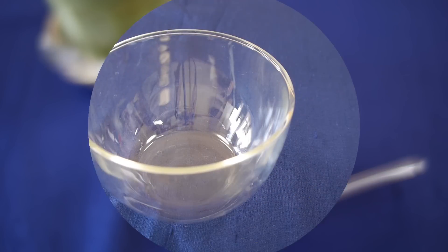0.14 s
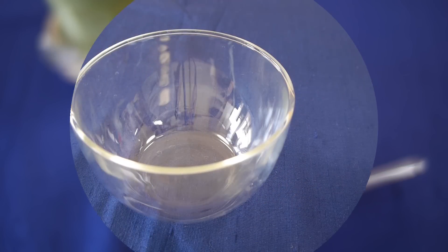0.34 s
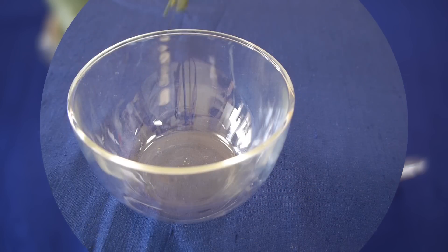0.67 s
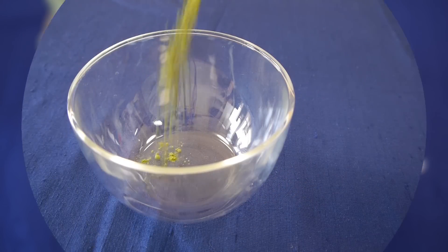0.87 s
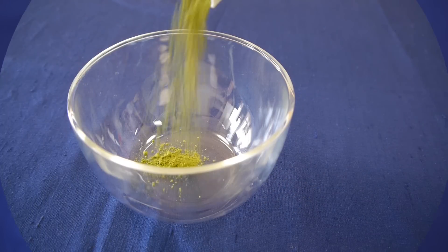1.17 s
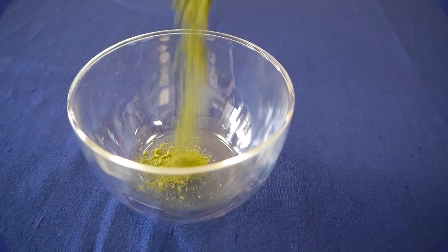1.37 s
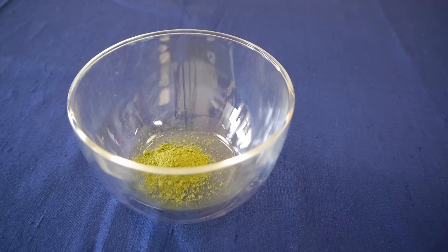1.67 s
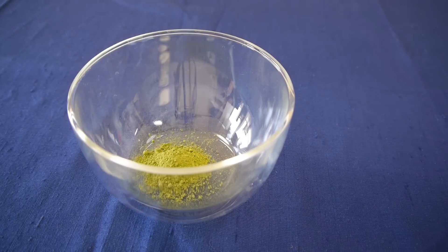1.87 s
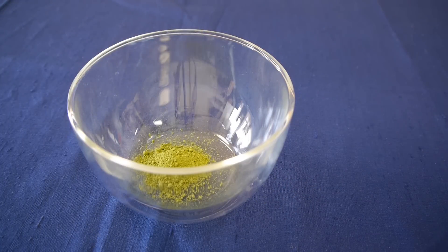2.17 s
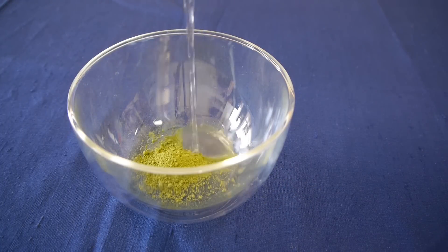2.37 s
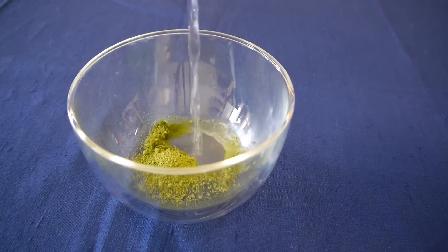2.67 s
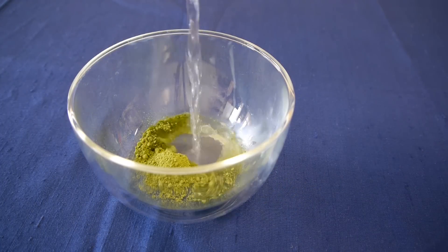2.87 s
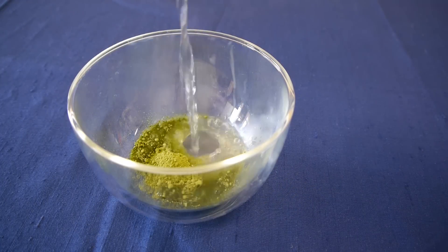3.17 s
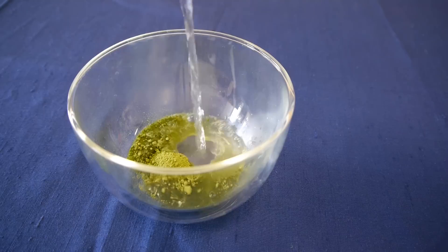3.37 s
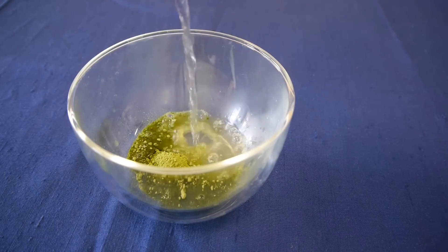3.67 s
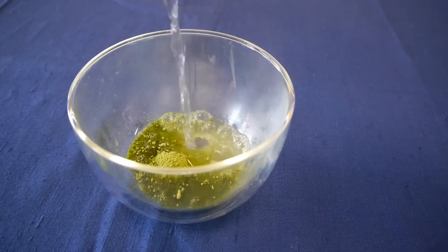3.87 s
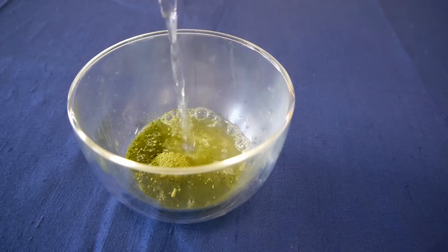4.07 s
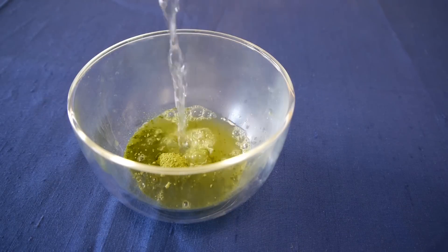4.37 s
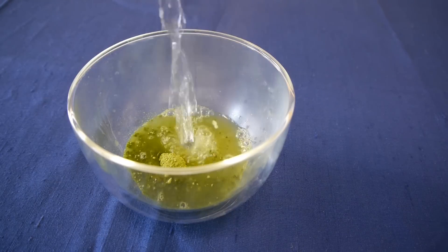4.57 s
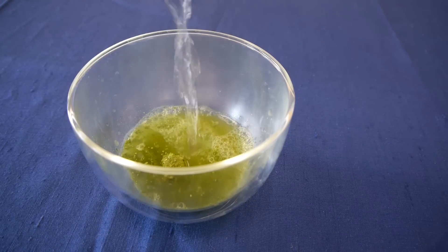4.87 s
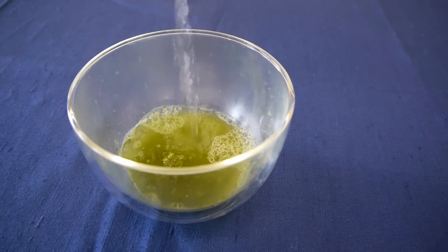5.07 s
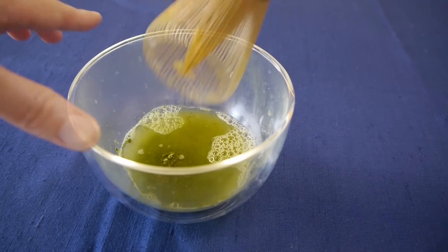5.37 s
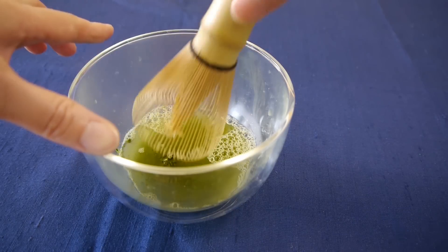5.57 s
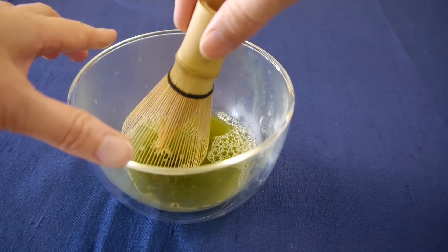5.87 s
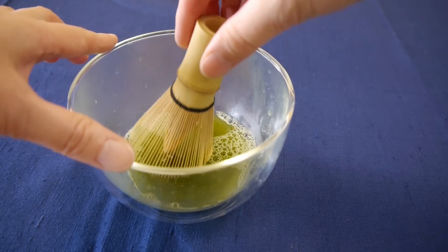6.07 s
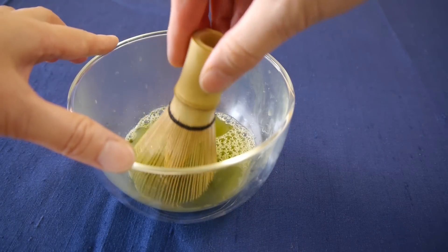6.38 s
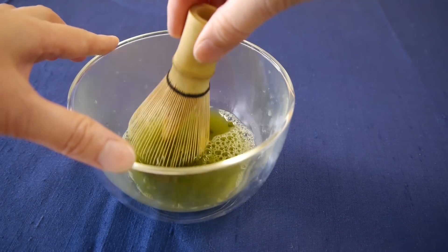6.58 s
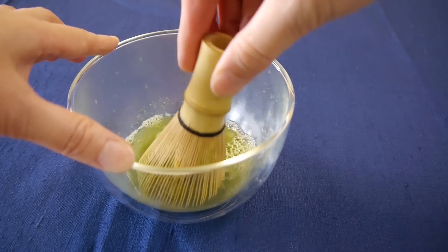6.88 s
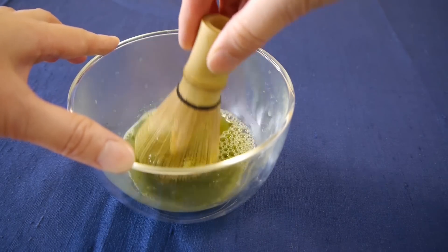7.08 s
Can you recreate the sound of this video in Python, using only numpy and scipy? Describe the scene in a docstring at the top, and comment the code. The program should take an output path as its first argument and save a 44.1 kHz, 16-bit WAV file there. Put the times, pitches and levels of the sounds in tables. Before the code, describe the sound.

Dry crumbs tinkle on glass, water pours in with bright splashing and bubbling, stops abruptly, and faint scratchy whisking follows in a quiet kitchen.

```python
"""A thin stream of water spatters on a glass bowl and gurgles in the growing pool, then its sound breaks off
abruptly: short damped tones make its drops and rising bubbles, coloured noise its spray and churn. Before it,
tea powder is tipped in: crumbs ring the modes of the glass, and dust hisses. After it foam fizzes, and a bamboo
whisk is lowered whose tines scrape and tick on the glass. A quiet kitchen hums behind, as noise and wavering
sines. One close microphone with gain control hears it all, the same in both channels."""
import sys
import numpy as np
from scipy import signal
from scipy.fft import rfft, irfft, next_fast_len
from scipy.io import wavfile
from scipy.ndimage import uniform_filter1d, map_coordinates

SR = 44100
rng = np.random.default_rng(int(sys.argv[2]) if len(sys.argv) > 2 else 0)


def dump_mix(stems):
    """Bounce the given channels to the path in sys.argv[1] as a 16-bit WAV at rate SR."""
    frames = np.atleast_2d(stems).T  # one column per channel
    limited = np.clip(frames, -1, 1)  # hard clip at full scale
    pcm = np.round(limited * 32767).astype(np.int16)
    wavfile.write(sys.argv[1], SR, pcm)


N = 319284

# modes of the glass bowl, lowest first: pitch_hz, relative level_db, nominal t60_s before damping
GLASS_MODES = [(876, -8.5, 0.052), (2822, -2.5, 0.12), (5530, -5, 0.027), (5623, -2, 0.076),
               (8500, -13, 0.021), (8750, -7.5, 0.053), (10630, -9.5, 0.081), (11100, -22, .08),
               (13970, -18, .05)]
# noise colour of dust, also used for foam: frequency_hz, relative level_db
DUST_COLOUR = [(880, -34), (1500, 2.5), (5670, -0.5), (7260, -3), (8660, 0), (15800, -15)]


def amp(db):
    """Gain for a level in dB."""
    return 10 ** (np.asarray(db) / 20)


def unit(x):
    """x scaled to rms 1."""
    return x / np.sqrt(np.mean(x ** 2) + 1e-20)


def curves(rows):
    """A gain per sample for each dB column after the time."""
    s, *columns = np.transpose(rows)
    t = np.arange(N) / SR
    return [amp(np.interp(t, s, db, -120)) for db in columns]


def wobble(rate):
    """A smooth random curve, rate knots a second."""
    grid_s = np.arange(0, N / SR + .001, .001)
    knots = rng.standard_normal(int(N * rate / SR) + 4)
    return np.interp(np.arange(N) / SR, grid_s, map_coordinates(knots, [grid_s * rate]))


def filtered(x, response):
    """x shaped by a complex response of frequency."""
    size = next_fast_len(N + SR // 2)
    return irfft(rfft(x, size) * response(np.fft.rfftfreq(size, 1 / SR)), size)[:N]


def grit(spectrum, per_s, spread_db, smooth):
    """Random specks of unequal size over a share of smooth noise, coloured, rms 1."""
    sizes = amp(spread_db * np.minimum(rng.exponential(size=N), 3))
    specks = (rng.random(N) < per_s / SR) * sizes
    burst = np.exp(-np.arange(96) / (0.00053 * SR))
    swell = unit(np.convolve(specks, burst)[:N])
    f, db = np.transpose(spectrum)

    def colour(hz):
        # straight lines in dB over log frequency
        return amp(np.interp(np.log(hz + 1), np.log(f + 1), db, -120, -120))
    return unit(filtered((swell + smooth) * rng.standard_normal(N), colour))


def swish(centre_hz, wide_hz):
    """A band of noise that follows a moving centre: two slow noises modulate a cosine and a sine."""
    slope = [(1, 0), (wide_hz / 2, -3), (wide_hz * 2, -30)]
    slow = [grit(slope, per_s=500, spread_db=0, smooth=.8) for _ in range(2)]
    turn = 2 * np.pi * np.cumsum(centre_hz) / SR
    return slow[0] * np.cos(turn) + slow[1] * np.sin(turn)


def blips(s, db, hz, t60, rise, soft_s, noisy, size):
    """Short damped tones that swell in and climb by a share rise of the pitch per t60; noise smears them."""
    t = np.arange(size) / SR
    db, hz, t60, rise = (np.reshape(v, (-1, 1)) for v in (db, hz, t60, rise))
    # 0 * db gives a shared pitch one row per event
    pitch_hz = np.minimum(hz * (1 + rise * t / t60) + 0 * db, SR / 2.2)
    turns = pitch_hz.cumsum(axis=1) / SR
    smear = 1 + noisy * uniform_filter1d(rng.standard_normal(turns.shape), size=4, axis=1)
    decay = amp(db - 60 * np.maximum(t - soft_s, 0) / t60)
    swell = np.minimum(t / soft_s, 1) ** 2
    wave = decay * swell * smear * np.sin(2 * np.pi * turns)
    at = (s * SR).astype(int)[:, None] + np.arange(size)
    return np.bincount(at.ravel(), wave.ravel(), N + SR)[:N]


def splashes(s, db, rise_s, fall_s):
    """An envelope that gathers just before each event and dies away after it, 60 dB in rise_s and fall_s."""
    t = np.arange(-SR // 50, SR // 12) / SR
    shape = np.where(t < 0, amp(60 * t / rise_s), amp(-60 * t / fall_s))
    events = np.bincount((s * SR).astype(int), amp(db), N)
    return signal.fftconvolve(events, shape)[SR // 50:][:N]


def strokes(rows, attack_s, release_s):
    """Gain that rises 20 dB, holds and falls 20 dB for each row, and the centre pitch passing from row to row."""
    t = np.arange(N) / SR
    gain = np.zeros(N)
    for s, hold, db, _ in rows:
        before = np.maximum(s - t, 0) / attack_s
        after = np.maximum(t - s - hold, 0) / release_s
        gain += amp(db - 20 * before - 20 * after)
    middles_s = [s + hold / 2 for s, hold, *_ in rows]
    return gain, np.interp(t, middles_s, [row[-1] for row in rows])


def glass(force, modes, damp):
    """Some of the bowl's modes, as resonators, answer a force; damp widens them and so shortens their ring."""
    def response(f):
        total = 0
        for hz, db, t60 in modes:
            drive = amp(db) * 1j * f * 1.19 * damp / t60
            total = total + drive / (hz * hz - f * f + 1j * f * 1.4 * damp / t60)
        return total
    return filtered(force, response)


def kitchen():
    """Appliance rumble and microphone hiss as coloured noise, with hum lines that waver in level and phase."""
    # rumble and hiss: frequency_hz, relative level_db
    room_colour = [(18, -24.5), (30, -8.5), (105, -1.5), (309, -1), (361, -3.5), (469, -6), (535, -7),
                   (880, -15), (2200, -20.5), (3260, -21.5), (3620, -22.5), (14500, -29), (15700, -24.5)]
    # hum lines: pitch_hz, relative level_db
    hum_lines = [(355.3, -59), (382.2, -65), (532.9, -67), (694.4, -68.5)]
    t = np.arange(N) / SR
    hum = np.zeros(N)
    for hz, db in hum_lines:
        level = amp(db + 4.5 + 2.5 * wobble(7.2))
        hum += level * np.sin(2 * np.pi * hz * t + 0.72 * wobble(6.8))
    room_db = -47.5 + .6 * wobble(4)
    return hum + amp(room_db) * grit(room_colour, per_s=1, spread_db=0, smooth=100)


def powder():
    """Crumbs clink on bare glass; dust keeps it ringing, then lands softly on the heap."""
    # hard crumbs on the glass: start_s, ring level_db, brightness_db per octave, extra_db for modes above 10 kHz
    clinks = [(0.5233, -45, 1.5, -15), (0.604, -23.5, -2.5, -12), (0.63, -42, -5, 14.5),
              (0.823, -30, 2, -8), (0.832, -11, 3, -21), (0.9124, -15.5, 5.5, -12.5), (0.928, -24, 10, -20),
              (0.942, -18, 6, -22), (0.9652, -18.5, -4.5, -3), (0.9773, -21, 1, -6),
              (0.9925, -17.5, -4.5, 2), (1.0084, -21.5, -2, -9), (1.039, -32, -6, 9), (1.066, -36, -3, 3),
              (1.1685, -38.5, -6, -15), (1.227, -37, -2, -8), (1.2635, -29, 3, -15),
              (1.2846, -26, 5.5, -14), (1.3001, -27, 10, -19), (1.3358, -38, 3, -18),
              (1.385, -26.5, 10, -25), (1.502, -34, 6, -25), (1.5397, -32, 12, -15)]
    # soft clumps landing on the heap: start_s, level_db, pitch_hz
    pats = [(1.232, -37, 904), (1.264, -33.5, 990), (1.315, -33.5, 998), (1.398, -36, 860),
            (1.432, -37, 850), (1.49, -38, 1380), (1.516, -24, 970), (1.535, -31, 1040), (1.556, -28, 980),
            (1.578, -28, 870), (1.602, -24, 890), (1.62, -28, 910), (1.646, -33, 870)]
    # falling powder: time_s, ring of the bare glass_db, hiss_db, patter on the heap_db (all relative)
    fall = [(0.8, -76, -82, -70), (0.834, -30, -43, -50), (0.878, -50, -60, -70), (0.912, -23.5, -50, -53),
            (0.986, -29, -46, -50.5), (1.136, -41.5, -73, -58), (1.23, -57, -45.5, -62),
            (1.304, -38, -43, -52), (1.39, -63, -52.5, -44.5), (1.464, -77, -60, -51.5),
            (1.51, -60, -46, -47), (1.608, -72, -52.5, -44.5), (1.75, -82, -92, -61)]
    scatter_db = 3  # each mode, crumb to crumb
    crack_db = -3  # against the ring
    out = np.zeros(N)
    t = np.arange(SR // 6) / SR
    hz, level_db, t60 = np.transpose(GLASS_MODES[1:])[..., None]
    for s, db, tilt_db, top_db in clinks:
        place_db = tilt_db * np.log2(hz / hz[0] / 2) + top_db * (hz > 10000)
        place_db = place_db + scatter_db * rng.standard_normal(hz.shape)
        # the heap muffles the glass as it grows
        muffle = 1 + 3.8 * max(s - 1.05, 0)
        rings = amp(db + level_db + place_db - 60 * t * muffle / t60) * np.sin(2 * np.pi * hz * t)
        crack_noise = uniform_filter1d(rng.standard_normal(len(t)), size=3)
        crack = amp(db + crack_db - 60 * t / 0.0019) / muffle * crack_noise
        out[round(s * SR):][:len(t)] += rings.sum(axis=0) * np.minimum(t / 0.00024, 1) + crack

    s, db, hz = np.transpose(pats)
    out += blips(s, db, hz, 0.024, 0, soft_s=0.0015, noisy=0.17, size=1024)

    ring, hiss, patter = curves(fall)
    dust = grit([(1500, 0), (16000, 0)], per_s=260, spread_db=4.0, smooth=1.0)
    heap_colour = [(550, -25), (800, 11.0), (1000, 6.0), (1250, 4), (2300, -5.5), (4000, -9.5)]
    heap = grit(heap_colour, per_s=180, spread_db=5.0, smooth=1.0)
    out += amp(18.5) * glass(ring * dust, GLASS_MODES[1:2], damp=4.1)
    out += amp(10.5) * glass((ring + amp(3.5) * hiss) * dust, GLASS_MODES[2:], damp=1.9)
    out += hiss * grit(DUST_COLOUR, per_s=1000, spread_db=-7, smooth=0.36)
    return out + patter * heap


def whisk():
    """Foam fizzes; tines drag over the glass and spring free with dry ticks, the faint ones at random."""
    # patches of foam bursting: start_s, length_s, level_db, centre_hz
    foam = [(5.09, .03, -67, 8200), (5.25, 0.034, -53.5, 7550), (5.32, 0.046, -52, 7780),
            (5.47, 0.024, -61, 7800), (5.56, 0.019, -60, 7550), (5.69, 0.046, -62, 8400)]
    # strokes over the glass: start_s, length_s, level_db, scrape centre_hz
    drags = [(5.97, 0.017, -57, 5200), (6.01, .01, -65, 4740), (6.062, 0.015, -49.5, 4700),
             (6.21, 0.13, -52.5, 4400), (6.42, 0.14, -51, 4900), (6.595, .01, -43, 5600),
             (6.72, 0.058, -46, 5200), (6.83, 0.069, -47, 5300), (7.03, 0.074, -50.5, 5000),
             (7.15, 0.07, -50.5, 4400)]
    # tines springing free: start_s, level_db, pitch_hz
    loud_ticks = [(5.979, -31, 8450), (6.015, -30, 9000), (6.0666, -31, 6260), (6.0993, -33, 9200),
                  (6.202, -42, 4270), (6.22, -34, 6270), (6.237, -43, 3130), (6.2705, -30, 8230),
                  (6.2938, -31, 8820), (6.3353, -29, 8960), (6.3711, -33, 6070), (6.4071, -35, 11600),
                  (6.4669, -32.5, 7220), (6.4734, -40, 3990), (6.4919, -30, 11200), (6.5297, -35, 7400),
                  (6.5537, -35, 4460), (6.5898, -26, 8250), (6.5996, -26, 6070), (6.6812, -29, 8540),
                  (6.693, -28.5, 8340), (6.733, -26.5, 8800), (6.758, -29, 8470), (6.7672, -34, 10700),
                  (6.7762, -37, 4600), (6.8184, -34.5, 4400), (6.854, -29, 6700), (6.8775, -26.5, 5800),
                  (6.9214, -36, 5700), (7.0331, -37, 10500), (7.0691, -29, 7800), (7.0925, -32, 11100),
                  (7.1413, -45, 4560), (7.1723, -49, 4860), (7.1723, -30.5, 4200), (7.2153, -31, 9060),
                  (6.0662, -30, 12600), (6.083, -35.5, 3100), (6.3443, -36, 8900), (7.229, -32, 9000)]
    # noise colour of the rubbing tines: frequency_hz, relative level_db
    tine_colour = [(880, -36), (1500, -13), (1770, -32), (2180, -29), (2380, -76), (3110, -6), (8660, -1),
                   (15800, -5.5)]
    fizz, fizz_hz = strokes(foam, attack_s=0.047, release_s=0.041)
    drag, scrape_hz = strokes(drags, attack_s=0.024, release_s=0.057)

    when, loud, pitch = rng.random((3, 40))
    s = 5.9 + 1.32 * when
    faint_db = 20 * np.log10(drag[(s * SR).astype(int)]) + 10 + 8 * (loud - .5)
    faint_ticks = np.transpose([s, faint_db, 3200 * 4.5 ** pitch])
    s, db, hz = np.vstack([loud_ticks, faint_ticks]).T
    ticks = blips(s, db, hz, 14 / hz, 0, soft_s=0.00032, noisy=1.8, size=256)

    rub = amp(-3) * grit(tine_colour, per_s=230, spread_db=-0.5, smooth=0.49)
    rub += amp(-13) * swish(scrape_hz, wide_hz=1000)
    froth = swish(fizz_hz, wide_hz=900)
    froth += amp(-2) * grit(DUST_COLOUR, per_s=400, spread_db=2, smooth=0.68)
    return ticks + drag * rub + fizz * froth


def water():
    """Drops smack and throw spray, bubbles chirp upward, the pool gurgles and the bowl hums along."""
    # strength of the stream: time_s, level_db
    stream = [(2.24, -55), (2.37, -42.5), (2.49, -37), (2.6, -29), (2.88, -36), (3.1, -34), (3.29, -30.5),
              (3.46, -39), (3.59, -25), (3.71, -37), (3.92, -24.5), (4.14, -28.5), (4.39, -27.5),
              (4.59, -22), (4.73, -30), (4.91, -25.5), (5.09, -27.5)]
    # loud drops that smack glass or pool: start_s, level_db, pitch_hz, thump_db against the smack
    loud_smacks = [(2.3198, -18.5, 8140, 2), (2.3462, -30, 7800, -18), (2.3644, -10, 8580, -10),
                   (2.4041, -14.5, 9000, -9), (2.43, 2, 8280, -3), (2.4498, -3, 13440, -22),
                   (2.5135, -39, 8000, -21), (2.5366, -9.5, 8740, -27), (2.5632, -22, 10300, -2),
                   (2.5824, -16.5, 10800, -5), (2.6607, -22, 8740, -18), (2.7044, -26, 8400, -18),
                   (2.7177, -15, 8400, -9), (2.7418, -14, 6400, -17), (2.7668, -26, 8930, -18),
                   (2.8105, -11.5, 5650, -13), (2.8343, -0.5, 8480, -49), (2.8693, -6, 10500, -28),
                   (2.889, -1, 10160, -29), (2.9259, -12.5, 8300, -17), (2.9496, -6.5, 10140, -13),
                   (2.971, -5, 10470, -18), (2.99, -12.5, 10400, -7), (3.0107, 5.5, 7930, -28),
                   (3.0317, -14, 7050, -18), (3.0451, -6.5, 10860, -18), (3.0775, -5, 13740, -17),
                   (3.1203, -13.5, 12800, -26), (3.1458, -4, 7280, -20), (3.1456, -3.5, 9570, -35),
                   (3.1552, -10, 9700, -20), (3.1631, 0.5, 8440, -19), (3.1894, 0.5, 7250, -27),
                   (3.2322, -15.5, 5760, -11), (3.2437, -8, 10400, -18), (3.257, 2, 6500, -24),
                   (3.2744, -2, 8400, -9), (3.3218, -12, 7650, -22), (3.3352, -8, 9200, -27),
                   (3.3564, -15, 9000, -36), (3.3853, -7, 10200, -31), (3.4124, -1, 11270, -46),
                   (3.4357, -5, 8900, -32), (3.4529, -3, 9340, -26), (3.4737, -19.5, 7600, -20),
                   (3.5016, -7, 7400, -12), (3.542, -4, 9260, -22), (3.5853, 4.5, 10280, -23),
                   (3.6029, 4, 11500, -23), (3.6366, -11, 13200, -23), (3.6496, -5, 11200, -15),
                   (3.678, -5.5, 7070, -15), (3.6922, -11, 8950, -18), (3.692, 2.5, 8820, -28),
                   (3.7211, -9, 7940, -24), (3.7427, -4.5, 10060, -23), (3.7565, -2, 11800, -18),
                   (3.779, -1, 11700, -24), (3.8079, -12, 11000, -21), (3.8473, -17, 10400, -18),
                   (3.874, -3, 11900, -11), (3.8773, -1.5, 10720, -4), (3.9025, -2, 9670, -5),
                   (3.9291, -8, 13000, -23), (3.9292, -13, 8900, -23), (3.9524, -17, 8900, -14),
                   (3.983, -8, 5900, -18), (4.0142, 0.5, 12450, -42), (4.0428, -18, 7010, -17),
                   (4.0595, 1, 10130, -23), (4.071, -4, 10800, -10), (4.0903, -3.5, 9200, -21),
                   (4.119, -8.5, 6740, -14), (4.1335, -4, 8400, -18), (4.1502, -2.5, 8080, -20),
                   (4.177, -27, 9820, -18), (4.175, -2.5, 8800, -32), (4.2053, -18, 9520, -18),
                   (4.2509, -2.5, 9420, -18), (4.2842, 0.5, 8260, -14), (4.3026, -3, 13630, -18),
                   (4.336, -10, 6660, -18), (4.3502, -1.5, 6400, -3), (4.3678, -9.5, 9100, -6),
                   (4.4031, -25, 14100, -23), (4.421, -5, 7480, -14), (4.4694, -10, 6900, -16),
                   (4.4724, -4, 8730, -18), (4.5166, -12, 7890, -18), (4.5345, -4.5, 8860, -18),
                   (4.5717, -24, 9400, -18), (4.5834, -1, 8200, -26), (4.6213, -24, 8630, -18),
                   (4.6222, -7, 7620, -23), (4.6585, 1, 9030, -33), (4.6856, -2, 9200, -11),
                   (4.7014, 1.5, 10500, -41), (4.7513, -16, 10000, -18), (4.7656, -10.5, 7400, -16),
                   (4.7957, -2, 8620, -23), (4.8176, -1.5, 8080, -21), (4.8383, -0.5, 8450, -18),
                   (4.855, -5, 8400, -21), (4.881, -9, 9650, -18), (4.9212, -6, 8330, -13),
                   (4.9448, -3.5, 9320, -23), (4.9633, 2, 7180, -29), (4.9897, -5, 8900, -7),
                   (5.009, -4.5, 7320, -18), (5.0663, -4.5, 9400, -15), (2.5224, -10.5, 8850, -43),
                   (2.5965, -23, 9050, -15), (2.6065, -13, 5520, -4), (2.6289, -16.5, 5200, -18),
                   (2.7831, -20, 5160, -14), (2.8014, -11, 4970, -36), (3.3404, -3, 9000, -15),
                   (3.3857, -5, 9740, -33), (3.5214, -1.5, 9400, -11), (3.6164, -8, 11400, -18),
                   (3.6676, -10, 8900, -12), (3.929, -10.5, 8900, -21), (3.9744, -12, 6100, -18),
                   (4.0184, -4, 8730, -32), (4.1674, -2, 8050, -21), (4.3174, -12, 6440, -16),
                   (4.3784, -8, 7750, -16), (4.4334, -7, 8100, -18), (4.4784, -5, 8500, -24),
                   (4.6114, -4.5, 7930, -18), (4.6664, -5.5, 6350, -9), (4.6754, -4, 9400, -23),
                   (4.7804, -11, 7770, -22), (4.8074, -7, 5960, -18), (4.9004, -7, 9640, -18),
                   (4.9114, -7, 7950, -12), (4.9344, -8, 9150, -18), (5.0474, -7, 9050, -18)]
    # loud trapped bubbles: start_s, level_db, pitch_hz, nominal chirp length_s
    loud_bubbles = [(2.811, -20, 3940, 0.029), (2.8338, -34, 4540, 0.015), (2.8457, -25, 2680, 0.018),
                    (2.8656, -20, 2820, 0.032), (2.9217, -22.5, 1380, 0.03), (2.9455, -13, 4170, 0.012),
                    (3.0104, -12.5, 3370, 0.03), (3.0448, -16, 2920, 0.022), (3.1191, -52, 3200, 0.017),
                    (3.145, -19, 2840, 0.013), (3.1616, -12, 2570, 0.015), (3.1902, -19, 1830, 0.03),
                    (3.2323, -8.5, 4140, 0.01), (3.2558, -5, 4380, 0.0097), (3.2747, -17, 3530, 0.017),
                    (3.296, -7, 2250, 0.016), (3.3195, -10.5, 3570, 0.018), (3.3404, -14, 4220, 0.012),
                    (3.3895, -20, 3140, 0.017), (3.4144, -25, 1640, 0.031), (3.4542, -24, 2690, 0.027),
                    (3.5037, -12.5, 4630, 0.0086), (3.5925, -7, 3810, 0.023), (3.6377, -17, 1470, 0.028),
                    (3.6494, -10.5, 2670, 0.013), (3.6838, -10, 2140, 0.011), (3.6966, -5.5, 3580, 0.02),
                    (3.722, -18, 2960, 0.021), (3.7505, -11.5, 1210, 0.013), (3.759, -1, 3300, 0.012),
                    (3.8073, -9, 1580, 0.032), (3.8479, -17.5, 1960, 0.037), (3.8839, -15.5, 1840, 0.015),
                    (3.9211, -4, 1420, 0.0057), (3.9806, -14, 3450, 0.019), (4.0186, -35, 3700, 0.017),
                    (4.041, -19, 3330, 0.017), (4.061, -6.5, 2820, 0.014), (4.0904, 2, 3740, 0.015),
                    (4.119, -9, 4240, 0.014), (4.133, -7.5, 1580, 0.0087), (4.171, -3, 2900, 0.013),
                    (4.2058, -9, 3870, 0.015), (4.2445, -13.5, 1485, 0.017), (4.276, -3.5, 3160, 0.0087),
                    (4.284, -13, 1510, 0.014), (4.3264, -32, 1200, 0.015), (4.327, -11, 1820, 0.014),
                    (4.4112, -22, 1810, 0.015), (4.4201, -16, 990, 0.014), (4.4348, -4.5, 3550, 0.014),
                    (4.476, -20, 3850, 0.024), (4.5159, -11, 1140, 0.012), (4.549, -13, 1720, 0.019),
                    (4.5998, -9, 1760, 0.012), (4.6566, -12.5, 2840, 0.019), (4.6718, -10, 2990, 0.017),
                    (4.7529, -18.5, 1210, 0.034), (4.771, -21, 3710, 0.013), (4.7823, -9.5, 3580, 0.017),
                    (4.8143, -11, 1310, 0.024), (4.8555, -10, 3300, 0.014), (4.8811, -18, 3720, 0.02),
                    (4.8969, -7.5, 3560, 0.026), (4.922, -10.5, 1370, 0.02), (4.9449, -4.5, 1240, 0.014),
                    (4.9618, -11.5, 1450, 0.017), (5.0085, -16, 3870, 0.026), (5.0232, -16, 3230, 0.017),
                    (5.067, -14, 1370, 0.015), (2.903, -17, 3830, .015), (2.95, -23, 2100, .02),
                    (3.247, -22, 1380, 0.018), (3.59, -18, 1500, 0.02), (3.616, -21, 2100, .017),
                    (3.688, -15, 1410, .02), (4.104, -12, 1610, .015), (4.139, -12, 3700, .017),
                    (4.449, -10, 1530, .015)]
    # heavy drops that thud: start_s, level_db
    heavy_drops = [(2.3199, -19.5), (2.367, -19.5), (2.4295, -9.5), (3.0093, -20), (4.0913, -19)]
    # noise colours of spray and of churning pool: frequency_hz, relative level_db
    spray_colour = [(2350, 3), (4000, -7.5), (4860, -4.5), (5640, -14), (6280, -4), (9120, 1.5),
                    (15200, -7), (16100, -69), (16500, -62)]
    gurgle_colour = [(290, -61), (500, -44), (868, 1), (1060, -12), (1440, 1), (2530, -7), (3680, 3),
                     (4820, -12), (6000, -12), (7800, -15), (13200, -120)]
    pour_s, fill_s, cut_s = 2.3, 2.18, 5.078  # pool starts, time it takes to cover the bottom, the water's sound breaks off

    def at(curve, s):
        return curve[(s * SR).astype(int)]

    spray, = curves(stream)
    depth = np.clip((np.arange(N) / SR - pour_s) / fill_s, 0, 1)
    # the gurgle grows 22 dB against the stream as the pool fills
    gurgle = spray * amp(-27 + 22 * depth)

    # small drops at random between the loud ones, sinking in pitch as the pour goes on
    when, loud, pitch, thump = rng.random((4, 70))
    s = pour_s + (cut_s - pour_s) * when
    small_db = 20 * np.log10(at(spray, s)) + 14 + 8 * (loud - .5)
    small_hz = 10120 * 2.12 ** (pitch - .5 - 0.13 * (s - pour_s))
    small_thump_db = -16 + 14 * (thump - .5)
    small_drops = np.transpose([s, small_db, small_hz, small_thump_db])
    s, db, hz, thump_db = np.vstack([loud_smacks, small_drops]).T
    smack_t60 = 0.0024 * 1.2 ** np.clip(rng.standard_normal(len(s)), -2, 1)
    smacks = blips(s, db, hz, smack_t60, 0.028, soft_s=0.00098, noisy=0.91, size=512)
    # bright edge of each smack, dulled in a deep pool
    snap_db = db - 6 - 24 * at(depth, s) ** 2
    smacks += blips(s, snap_db, 13500, 0.00067, 0, soft_s=0.00038, noisy=1.1, size=256)
    thump_level_db = db + thump_db - 3 * (1 - at(depth, s))
    thumps = blips(s, thump_level_db, 3410, 0.00097, 0, soft_s=0.00125, noisy=1.3, size=256)

    # each drop also strikes the glass: a short push of noise
    blows = unit(splashes(s, 0.74 * db, rise_s=0.0015, fall_s=0.0025)) * rng.standard_normal(N)
    # the deepening pool damps the bare glass by up to 36 dB
    ring = glass(amp(-28 - 36 * depth) * blows, GLASS_MODES[1:6], damp=3.9)
    # water on the glass lowers and blurs its ring
    wetted = [(.92 * mode_hz, level_db, t60) for mode_hz, level_db, t60 in GLASS_MODES[2:4]]
    ring += glass(amp(-51.5) * blows, wetted, damp=3.2)

    # spray gathers just before each smack and rains back after it
    splash = splashes(s, db, rise_s=0.0044, fall_s=0.012)
    spatter = amp(-10) * splash + amp(-6.5) * spray * amp(4.4 * wobble(45))
    beds = spatter * grit(spray_colour, per_s=600, spread_db=5.5, smooth=0.19)
    # a deep pool throws no finer spray
    dulled = filtered(beds, lambda f: 1 / (1 + (f / 11900) ** 6))
    beds += depth ** 3.6 * (dulled - beds)

    s, db, hz, t60 = np.transpose(loud_bubbles)
    t60 = np.clip(t60, .004, .04)
    churn = amp(-18.5) * splashes(s, db, rise_s=0.0066, fall_s=0.059)
    churn += gurgle * amp(0.5 + 1.26 * wobble(40))
    beds += churn * grit(gurgle_colour, per_s=360, spread_db=5.0, smooth=0.19)
    # a smeared plop, then a weaker, clear chirp that climbs as the bubble nears the surface
    bubbles = blips(s, db, hz, 0.26 * t60, 0.08688, soft_s=0.0012, noisy=.35, size=768)
    bubbles += blips(s, db - 7, .95 * hz, 1.62 * t60, 0.46698, soft_s=0.00088, noisy=0.046, size=1536)
    # big, low bubbles shake the bowl's lowest mode
    kicks = splashes(s, db - 35 - 9 * np.log2(hz / 1200), rise_s=0.0045, fall_s=0.024)

    # small bubbles at random, their level set by the gurgle
    when, pitch, loud, climb = rng.random((4, 700))
    s = pour_s + (cut_s - pour_s) * when
    hz = 900 * 5.19 ** pitch ** 1.056
    small_db = 20 * np.log10(at(gurgle, s)) - 3 + 13 * loud
    small = blips(s, small_db, hz, 34 / hz, 0.062 + .5 * climb, soft_s=0.0019, noisy=0.23, size=768)

    # the lowest mode hums while the stream is strong, 9 dB weaker when the bottom is covered
    hum = amp(-44 - 9 * depth) * (spray > amp(-45)) + kicks
    shaking = (np.sqrt(np.abs(unit(splash))) + 0.42) * rng.standard_normal(N)
    low = hum * unit(glass(shaking, GLASS_MODES[:1], damp=2.9))

    # small drops carry no bass
    wet = filtered(smacks + thumps + bubbles + small + beds, lambda f: f ** 4 / (f ** 4 + 394.0 ** 4))
    s, db = np.transpose(heavy_drops)
    thuds = blips(s, db, 250, 0.0012, 0, soft_s=0.00063, noisy=0.072, size=512)
    return (wet + low + amp(15.5) * ring + thuds) * (np.arange(N) < cut_s * SR)


def scene():
    """Powder, water and whisk with a short weak tail from worktop and walls, over the kitchen."""
    close = powder() + water() + whisk()
    t = np.arange(SR // 10) / SR
    tail = rng.standard_normal(len(t)) * amp(-60 * t / 0.03)
    echo = signal.fftconvolve(close, tail / np.linalg.norm(tail))[:N]
    return np.tile(close + amp(-11.5) * echo + kitchen(), (2, 1))


def record(dry):
    """Gain control eases loud stretches, peaks clip softly, sound starts after a silent lead-in."""
    start_s, top_hz = .336, 16700  # end of the silence, upper limit of the band
    level_db = 10 * np.log10(np.abs(uniform_filter1d(dry[0] ** 2, size=2000)) + 1e-12)
    # 0.22 dB less for each dB above -33 dB
    eased = dry[0] * amp(-.22 * np.maximum(level_db + 33.0, 0))
    x = eased * np.clip((np.arange(N) / SR - start_s) / 0.0065, 0, 1)
    x = x / (1 + np.abs(x) ** 8) ** (1 / 8)
    return np.tile(filtered(x, lambda hz: hz < top_hz), (2, 1))


dry = scene()
out = record(dry)
dump_mix(out)
```